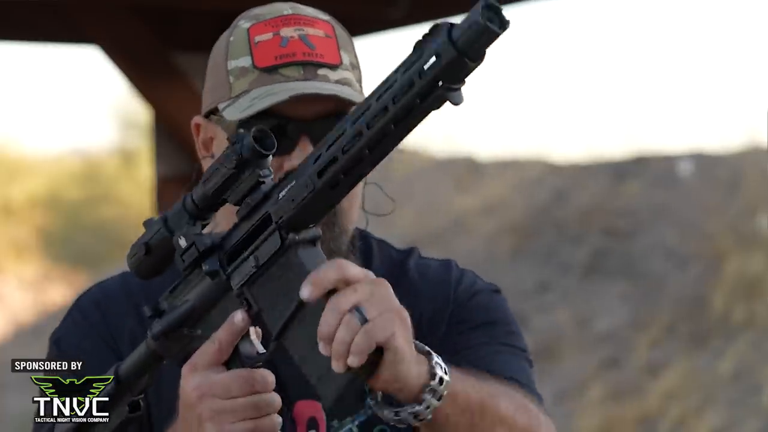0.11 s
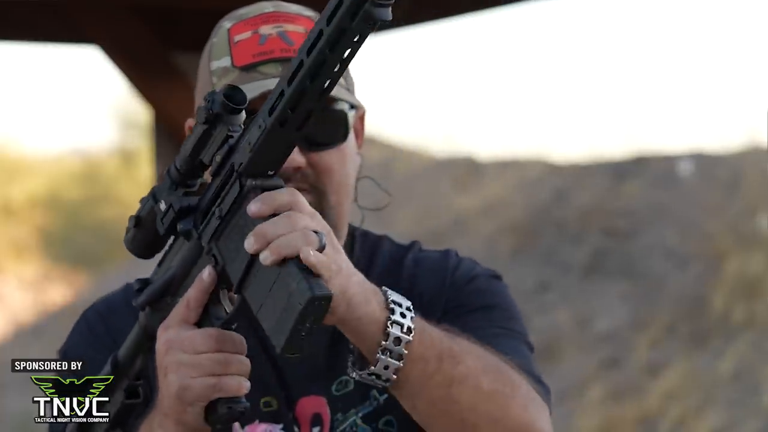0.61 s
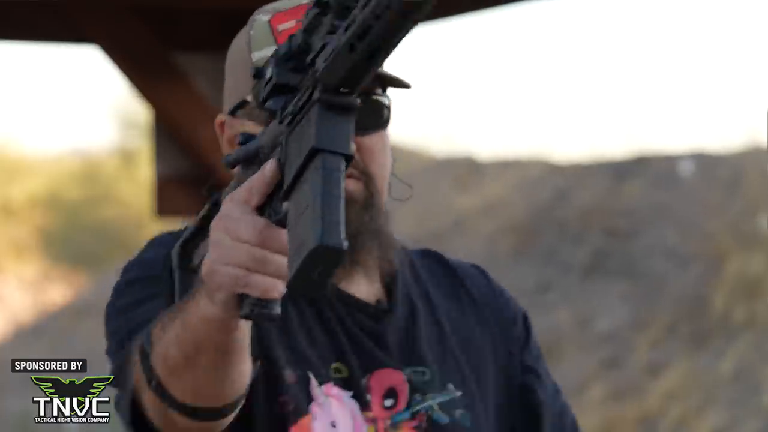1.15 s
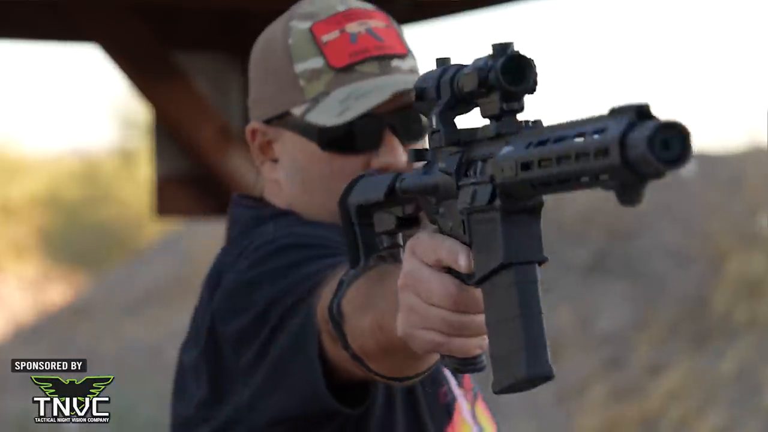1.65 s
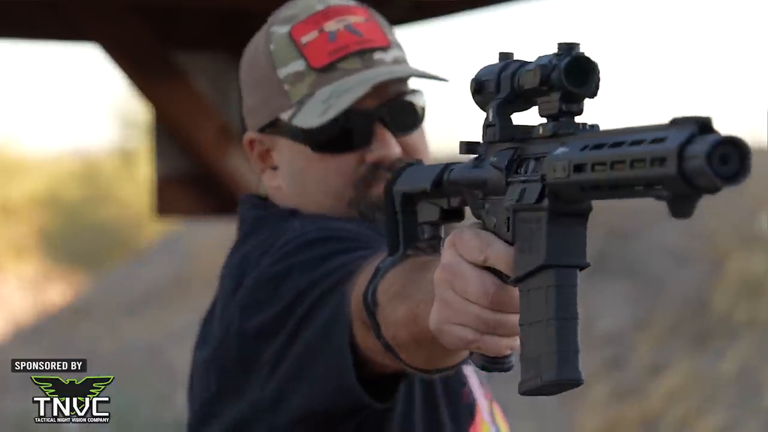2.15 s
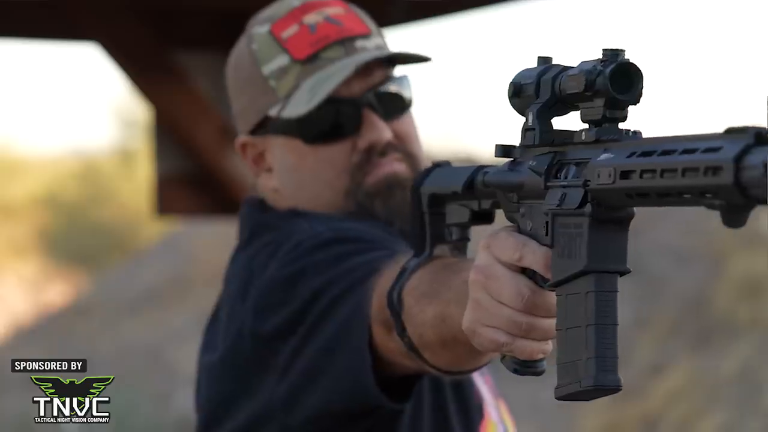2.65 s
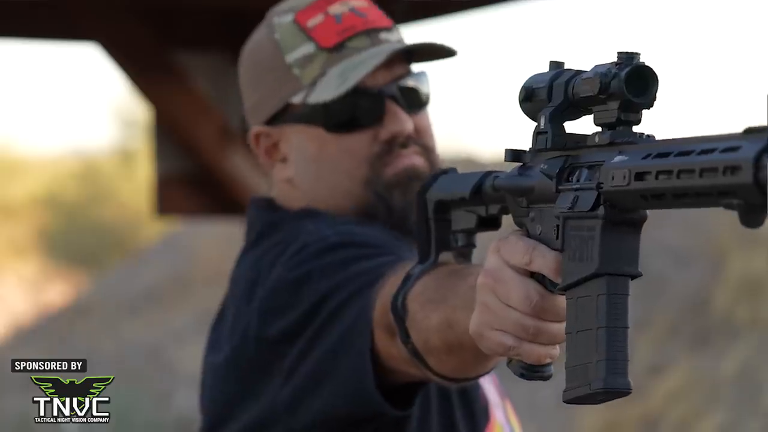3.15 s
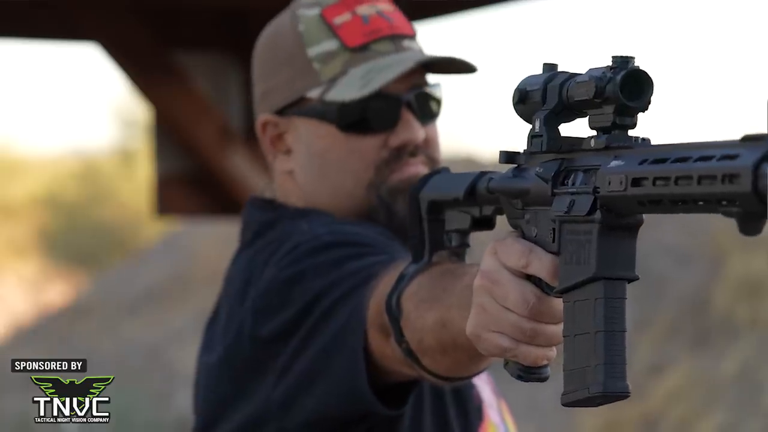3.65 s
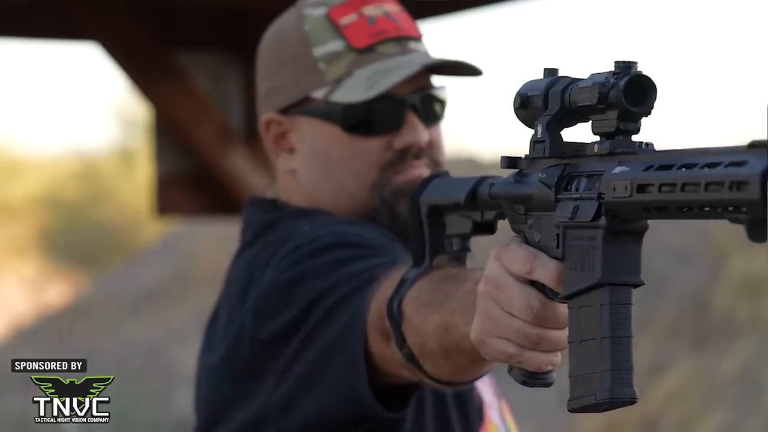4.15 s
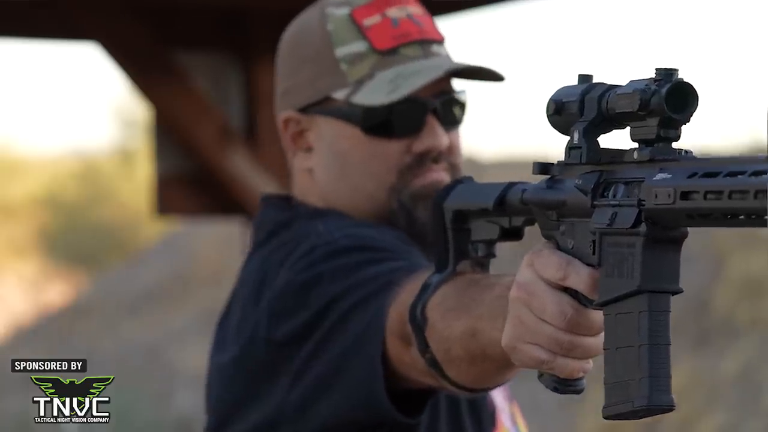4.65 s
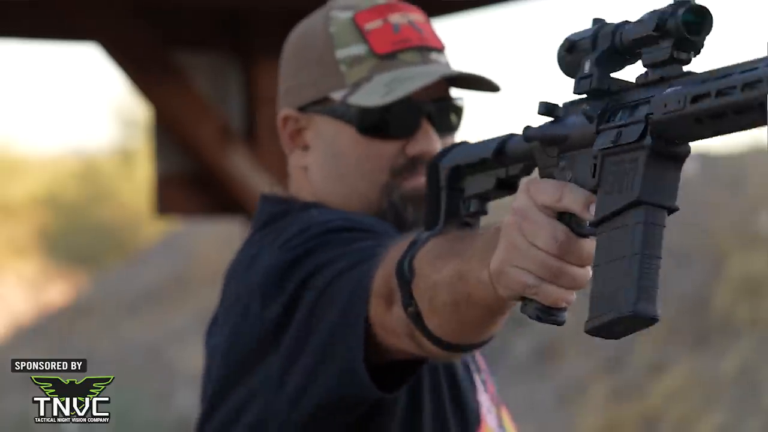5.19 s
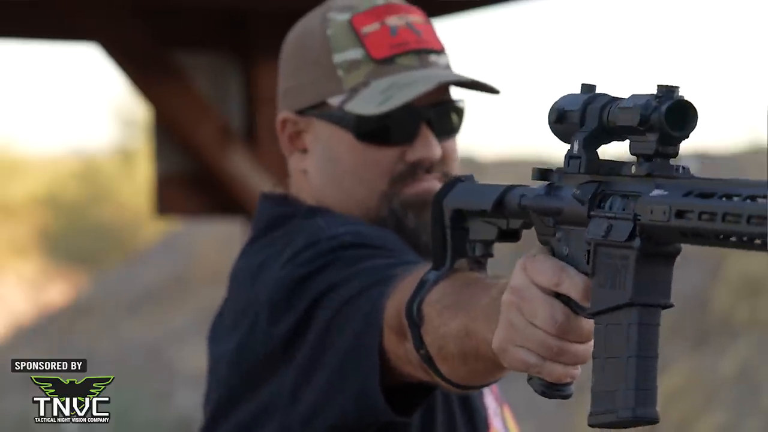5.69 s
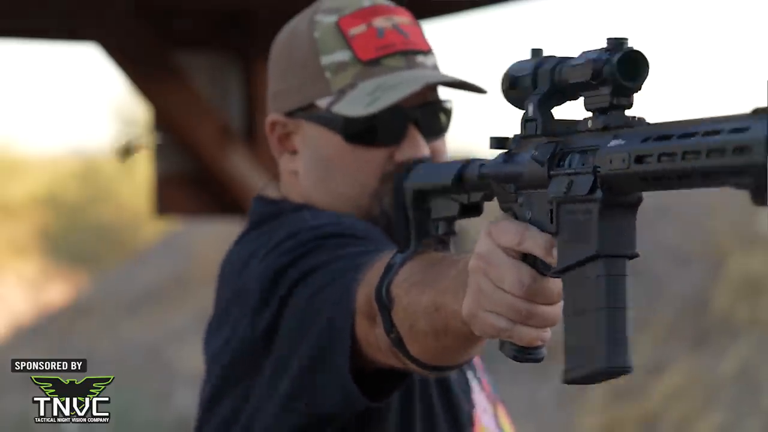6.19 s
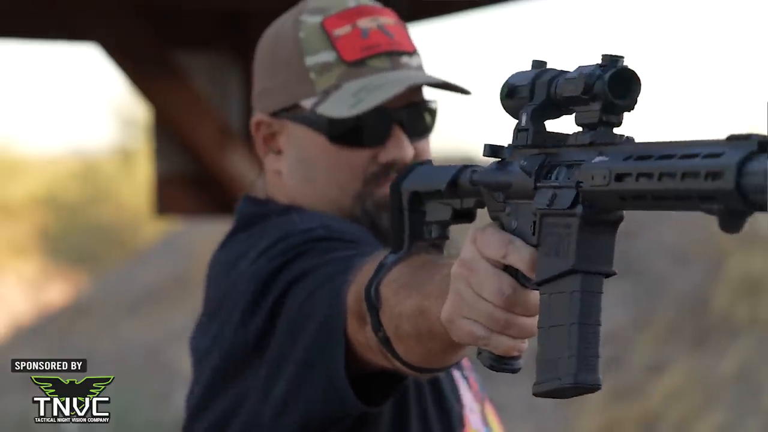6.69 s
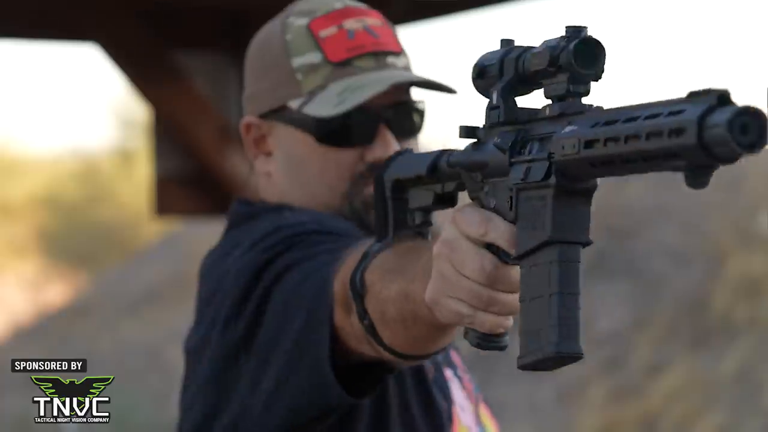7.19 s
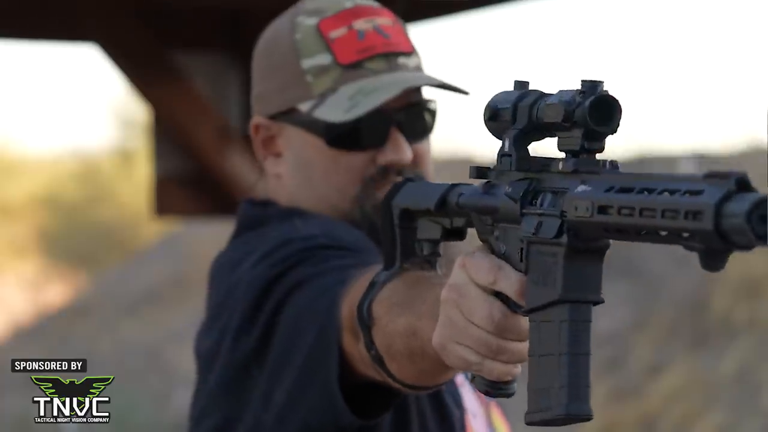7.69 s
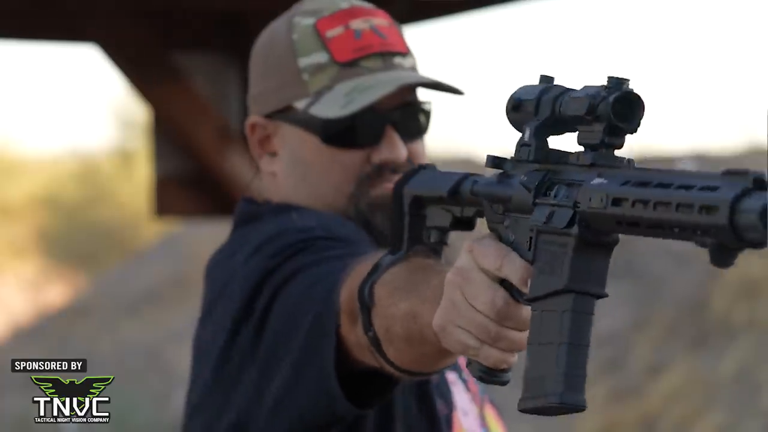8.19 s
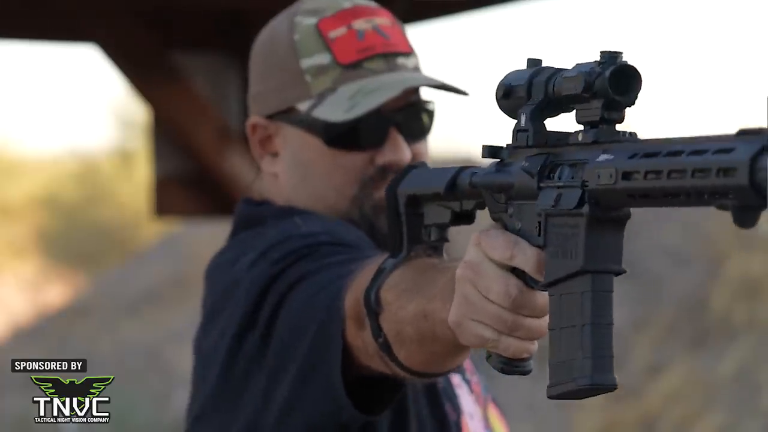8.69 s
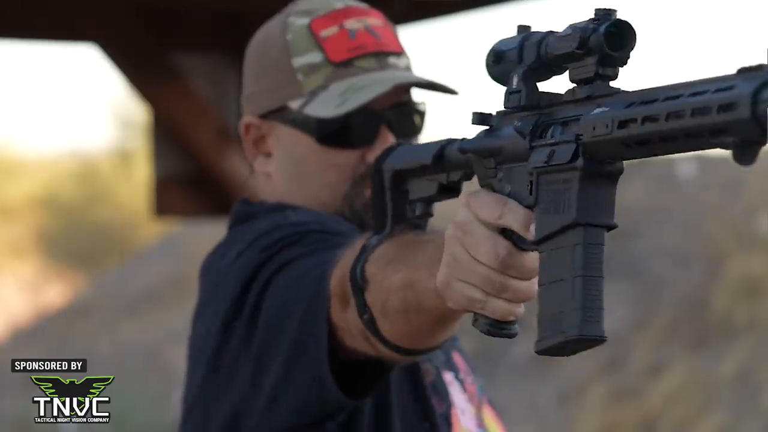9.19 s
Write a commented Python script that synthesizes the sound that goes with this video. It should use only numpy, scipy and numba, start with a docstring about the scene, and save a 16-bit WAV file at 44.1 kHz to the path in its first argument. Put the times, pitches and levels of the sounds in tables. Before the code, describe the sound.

A rifle is loaded and cocked with sharp metallic clacks, distant gunfire thuds dully, then five loud overloaded shots echo off hills as spent cases tinkle.

```python
"""Five rifle shots under a range roof: a low blast, clicks of the action, boom of the sheet roof, echoes off hills.
Before them the rifle is loaded and cocked close by: noise clicks, gritty slides, ringing receiver modes.
Spent cases ring on the concrete as beating mode pairs, and one strikes a steel post; a few low thuds.
Far gunfire is dull noise that swells as the land returns it, over hiss and a faint rumble.
One microphone overloads on the blast and feeds two channels of unequal gain, each with a fast limiter."""
import sys
import numpy as np
from scipy import signal
from scipy.fft import rfft, irfft, next_fast_len
from scipy.io import wavfile
from scipy.ndimage import uniform_filter1d
from numba import njit

SR = 44100
rng = np.random.default_rng(int(sys.argv[2]) if len(sys.argv) > 2 else 0)


def voltage_ratio(decibels):
    """Convert decibels (scalar or array-like) to amplitude ratios, 20 dB per decade."""
    exponent = np.asarray(decibels, float) / 20
    return 10 ** exponent


def to_wav(s):
    """Save 16-bit WAV."""
    ch = np.atleast_2d(s).T  # columns
    pcm = np.round(np.clip(ch, -1, 1) * 32767)  # PCM
    wavfile.write(sys.argv[1], SR, pcm.astype(np.int16))


N = 411453

# Shots of the near rifle: t/s, strength/dB, delay of the bolt hitting its rear stop/s
RIFLE_SHOTS = [(4.8768, 0, .0796), (6.115, 0, .0772), (6.8793, 0, .0772), (7.851, 0.5, 0.081),
               (8.9261, 0, .0778)]
MID_DB = 5.5  # taken off the handling clicks and far fire, to allow for the mean gain of the channels


def band(x, hz, width):
    """Band-pass whose width is a share of its centre."""
    edges = [hz / (1 + width), min(hz * (1 + width), 0.47 * SR)]
    return signal.sosfilt(signal.butter(N=2, Wn=edges, btype="band", fs=SR, output="sos"), x)


def add(out, s, x):
    """Mixes x into out from time s."""
    i = int(s * SR)
    out[i:i + len(x)] += x[:len(out) - i]


def rms(x):
    """Root mean square."""
    return np.sqrt(np.mean(x ** 2))


def wander(size, seconds):
    """Smooth chance of spread 1 that changes over the given time."""
    k = int(seconds * SR)
    x = uniform_filter1d(uniform_filter1d(rng.standard_normal(size), k), k)
    return x / x.std()


def fade(t60):
    """Envelope that loses 60 dB in t60 s."""
    return np.exp(-np.log(1000) * np.arange(int(t60 * SR) + 8) / (t60 * SR))


def ring(hz, db, t60, phase=None):
    """One struck mode: a decaying sine, steady or with a wandering phase in radians."""
    env = fade(t60)
    bend = 0 if phase is None else phase[:len(env)]
    return voltage_ratio(db) * env * np.sin(2 * np.pi * hz * np.arange(len(env)) / SR + bend)


def click(db, hz, t60, width=0.84):
    """A short burst of band-passed noise with a rise of half a ms and its peak at db."""
    env = fade(max(t60, 0.003))[:4096]
    rise = np.minimum(np.arange(len(env)) / 20, 1)
    burst = band(rng.standard_normal(len(env)) * env * rise, hz, width)
    return voltage_ratio(db) * burst / np.abs(burst).max()


def swell(t, db, rise, t60):
    """Power that rises as a bell to db at t = 0, then loses 60 dB in t60 s."""
    decay = voltage_ratio(-120 * np.maximum(t, 0) / t60)
    return voltage_ratio(2 * db) * np.where(t < 0, np.exp(-(t / rise) ** 2), decay)


def controls(t, level, *others):
    """Rows of time, level in dB and each other power in dB against the level."""
    return np.transpose([t, 10 * np.log10(level), *(10 * np.log10(p / level) for p in others)])


def rolling(curve, colour, noises, hump=((0, 500, 0),)):
    """Noise in third-octave bands whose levels follow level, bass and treble curves and a moving hump."""
    hump_octaves = 0.52
    size = noises.shape[1]
    t = np.arange(size) / SR
    s, level_db, bass_db, treble_db = np.transpose(curve)
    hump_s, *columns = np.transpose(hump)
    hump_hz, hump_db = (np.interp(t, hump_s, c) for c in columns)
    colour_hz, *colour_columns = np.transpose(colour)
    freqs = np.fft.rfftfreq(size, 1 / SR)
    spectra = rfft(noises)
    out = 0
    for hz in 40 * 2 ** (np.arange(27) / 3):
        db, bass, treble, *new = (np.interp(np.log(hz), np.log(colour_hz), c) for c in colour_columns)
        spectrum = spectra
        if new:  # the first noise is common to all, the others are fresh for each
            share = np.clip(new[0], 0.01, 1)
            spectrum = np.sqrt(1 - share) * spectra[0] + np.sqrt(share) * spectra[1:]
        mask = np.cos(np.pi / 2 * np.clip(3 * np.log2(freqs / hz + 1e-9), -1, 1))
        lift_db = hump_db * np.exp(-(np.log2(hz / hump_hz) / hump_octaves) ** 2)
        curve_db = db + level_db + bass * bass_db + treble * treble_db
        gain = voltage_ratio(lift_db + np.interp(t, s, curve_db))
        out = out + gain * irfft(spectrum * mask, size) / rms(mask)
    return out


def hiss_and_rumble():
    """Hiss of the microphone, broad noise, over a faint low outdoor rumble."""
    hiss = voltage_ratio(-80.5) * band(rng.standard_normal(N), 6000, 2.7)
    rumble = voltage_ratio(-54) * band(rng.standard_normal(N), 90, 1.4)
    return hiss + rumble


def far_fire():
    """Each distant shot is dull noise that swells as the land returns it, with a low thump off the far side."""
    # Far guns: t/s, level/dB, bass/dB, stretch of the return delays from where the gun stands
    far_shots = [(.06, -54.5, -5, 1), (0.341, -51, -6, 0.97), (.46, -54.5, -4, 1), (.69, -52, -7, 1),
                 (.88, -50, -2, 1), (1.06, -50.5, -6, 0.99), (1.23, -59.5, -4, 1), (2.389, -39.5, 0, 0.98),
                 (2.618, -40, 0.5, 0.96), (2.824, -39.5, -1.5, 0.98), (3.111, -38.5, 0, 1),
                 (3.339, -39.5, -0.5, 1), (3.55, -39, -0.5, 0.97), (4.13, -39, 2.5, 0.88),
                 (4.3, -38.5, 5, 0.84), (4.49, -39, 4.5, 0.77), (4.686, -37.5, 1.5, 0.81),
                 (5.77, -38.5, 5.5, 1)]
    # How the land returns a far shot: delay/s before the stretch, level/dB, rise/s, t60/s,
    # bass/dB before that of the gun, treble/dB
    far_returns = [(.02, -16, .012, .4, 6.5, -8.5), (.1, -14, 0.027, .3, 3, -7.5),
                   (.168, 1, .035, 0.3, -7.5, -19.5), (.275, -3.5, .025, .25, -4.5, -19),
                   (0.389, -12.5, .05, 0.62, 4.5, -20)]
    # Tone of the far fire: f/Hz, level of a third octave/dB, share of the bass, share of the treble
    far_colour = [(60, -21.5, 1, 0.099), (139, -12.5, 0.99, 0.48), (220, -12, 0.94, 0.084),
                  (442, -4.5, 1, 0.075), (900, -5.5, 0, 0), (1420, -6, 0.065, 0.46),
                  (1980, -12, 0.16, 0.92), (3000, -26.5, 0.013, 0.88), (6000, -50.5, 0.38, 0.44)]
    # Murmur between bursts: level/dB, bass/dB, treble/dB
    murmur = (-70.5, 0, 0)
    # Low thump: delay/s, f/Hz, level against the bass of the shot/dB, t60/s
    far_thump = (0.1, 184.5, -4.5, .15)
    quiet_db, quiet_bass_db, quiet_treble_db = murmur
    thump_s, thump_hz, thump_db, thump_t60 = far_thump
    seconds = 6.3
    t = np.arange(0, seconds, 0.002)
    # powers over time
    level = voltage_ratio(2 * quiet_db) + 0 * t
    bass, treble = level * voltage_ratio(2 * quiet_bass_db), level * voltage_ratio(2 * quiet_treble_db)
    out = np.zeros(N)
    for s, db, bass_db, stretch in far_shots:
        thump = ring(thump_hz, db + bass_db + thump_db, thump_t60, 1.5 * wander(SR, 0.025))
        add(out, s + thump_s, thump * np.minimum(np.arange(len(thump)) / 400, 1))
        for delay, part_db, rise, t60, low_db, high_db in far_returns:
            part = swell(t - s - stretch * delay, db + part_db, rise, t60)
            level = level + part
            bass = bass + part * voltage_ratio(2 * (low_db + bass_db))
            treble = treble + part * voltage_ratio(2 * high_db)
    noise = rng.standard_normal((1, next_fast_len(int(seconds * SR))))
    far = rolling(controls(t, level, bass, treble), far_colour, noise)[0]
    fade_out = np.minimum(np.arange(len(far))[::-1] / 8000, 1)
    add(out, 0, voltage_ratio(-MID_DB) * far * fade_out)
    return out


def thuds():
    """Soft low blows: a few low modes struck together."""
    # Modes: f/Hz, level against each other/dB, t60/s
    thud_modes = [(80, 16, 0.77), (124, 11.5, 0.43), (162, -21, 0.22)]
    # Blows, each begun 4 ms ahead: t/s, peak level/dB
    blows = [(1.089, -40.5), (1.324, -40), (1.625, -41), (1.727, -41), (2.235, -41), (4.109, -41)]
    out = np.zeros(N)
    body = sum(np.pad(ring(hz, db, t60), (0, SR))[:SR] for hz, db, t60 in thud_modes)
    for s, db in blows:
        add(out, s - 0.004, voltage_ratio(db) * body / np.abs(body).max())
    return out


def cases():
    """A bounce is a tick and three beating mode pairs; the next one chokes it and the tumbling makes it flutter."""
    # Bounces on the concrete: t/s, tick level/dB, ring level/dB, step from one mode to the next/dB
    bounces = [(5.602, -39, -41.5, -8), (5.684, -45, -55.5, -4), (5.82, -49, -65, -4),
               (5.857, -60, -64, -3), (5.922, -55, -70, -1), (5.978, -59, -74, 1),
               (6.825, -34.5, -48.5, -1.5), (7.27, -41, -57, 1), (7.654, -35, -34, -2.5),
               (8.626, -34, -44, 1), (8.777, -53, -75, 1), (8.836, -51, -79, 5)]
    # Mode pitches, one row a case: f/Hz, f/Hz, f/Hz
    case_hz = [(9577, 12620, 14430), (9450, 12620, 14480), (9440, 12640, 14510), (9426, 12600, 14500)]
    # Mode pairs of brass: nominal split/Hz (varied at each bounce), t60/s, level/dB
    case_pairs = [(35, 0.31, -1), (45, 0.32, -5), (50, 0.29, -0.5)]
    flight_s = 0.6  # a case lands no sooner after its shot
    out = np.zeros(N)
    times = np.transpose(bounces)[0]
    case = np.searchsorted(np.transpose(RIFLE_SHOTS)[0] + flight_s, times) - 1
    same_case_next = np.diff(case) == 0
    untils = np.append(np.where(same_case_next, times[1:], N / SR), N / SR)
    for (s, tick_db, ring_db, step_db), k, until in zip(bounces, case, untils):
        add(out, s, click(tick_db, 8000, 0.01))
        for m, (hz, (split_hz, t60, mode_db)) in enumerate(zip(case_hz[k], case_pairs)):
            db = ring_db + mode_db + m * step_db
            partner_hz = hz - split_hz * rng.uniform(0.57, 1.3)
            pair = ring(hz, db, t60) + ring(partner_hz, db - 8.5, t60)
            flutter = voltage_ratio(3.0 * wander(SR, 0.012)[:len(pair)])
            choke = np.clip(((until - s) * SR - np.arange(len(pair))) / 200 + 1, 0, 1)
            add(out, s, pair * flutter * choke)
    return out


def post_strike():
    """A case strikes a steel post: one long mode of uneven level, with a tick 35 ms ahead of it."""
    # Ring of the post: t/s, f/Hz, level/dB, t60/s
    steel_post = (8.66, 1443, -54, 2.5)
    s, hz, db, t60 = steel_post
    out = np.zeros(N)
    post = ring(hz, db, t60)
    add(out, s, post * voltage_ratio(3.0 * wander(len(post), 0.027)))
    add(out, s - 0.035, click(-28.5, 1400, 0.011))
    return out


def slides():
    """Metal, hands and cloth rubbing: noise of uneven grit under a smooth swell."""
    # Slides: from t/s, to t/s, rms level/dB, f/Hz
    rubs = [(0, 0.066, -47.5, 1100), (0, 0.09, -60.5, 7900), (0.083, 0.147, -44.5, 3000),
            (0.121, 0.176, -44, 1440), (.18, .68, -81, 3500), (0.332, 0.42, -69.5, 3000),
            (0.492, .545, -78, 11000), (0.701, 0.749, -31, 2200), (0.752, 1.629, -79.5, 3490),
            (1.658, 1.98, -78, 3880), (2.64, 2.763, -76.5, 4450)]
    out = np.zeros(N)
    for start, end, db, hz in rubs:
        size = int((end - start) * SR)
        grit = rng.standard_normal(size) * voltage_ratio(1.6 * rng.exponential(size=size))
        rub = band(grit, hz, 1.1) * np.sqrt(np.hanning(size))
        add(out, start, voltage_ratio(db) * rub / rms(rub))
    return out


def receiver_ring():
    """Bolt and selector set the modes of the receiver ringing, the hand damps it."""
    # Rings: t/s, level/dB, share of the free ring time, tilt about 4 kHz/dB an octave
    rings = [(.746, -43.5, 1.2, 0), (1.615, -38, 0.17, 8.5)]
    # Free modes of the rifle: f/Hz, level/dB, t60/s
    rifle_modes = [(2046, -5, .5), (2309, -4, .3), (2864, -9, .3), (3596, -6, .2), (4500, -7, .15),
                   (6481, -5, .25), (6800, -2, .3), (7138, -2, .16), (9249, -8, .13), (10500, -6, .08)]
    out = np.zeros(N)
    for s, ring_db, share, tilt_db in rings:
        for hz, db, t60 in rifle_modes:
            mode_db = db + ring_db + tilt_db * np.log2(hz / 4000)
            add(out, s, ring(hz, mode_db, share * t60))
    return out


def handling():
    """Loading, cocking and small ticks as clicks in three bands; heavy blows ring longer, in step with size."""
    # Magazine, bolt, selector and small ticks, some at the start of far shots: t/s,
    # level near 4.8 kHz before MID_DB/dB, level near 1.1 kHz against it/dB, level near 10.6 kHz against it/dB
    knocks = [(0.0074, -40, 10, -5), (0.027, -41, 7, -11), (0.0947, -35, -8.5, -13), (0.106, -22.5, -2, 7),
              (0.1294, -13.5, 4, -3.5), (0.2214, -43, -12, -9), (0.262, -42, -1, -8), (0.3272, -52.5, 7, 7),
              (0.3475, -52, 19, -10), (0.5124, -67, 19, 21), (0.53, -53.5, -9, 10),
              (0.613, -59.5, 11.5, -12), (0.6864, -14.5, -3.5, -4), (0.7012, -17, 4.5, 1.5),
              (0.7198, -22.5, 6.5, -10.5), (0.7328, -18.5, -2.5, 2.5), (0.7445, -6, -7, -7),
              (0.878, -35.5, -14, -11), (0.9515, -42.5, -9, -6), (1.0834, -46, -15, 7),
              (1.5686, -28, -14, 0), (1.614, -16, -8.5, -1), (1.7474, -52, -1, -16),
              (1.7993, -53, 4, -18.5), (2.15, -50.5, 9, -25.5), (2.3892, -54, 17.5, -28),
              (2.6174, -58.5, 16.5, -13), (3.5823, -55, 5, -24), (4.1324, -67, 13, -10)]
    out = np.zeros(N)
    for s, db, low_db, high_db in knocks:
        t60 = 0.016 + 0.03 * voltage_ratio(db)
        for hz, band_db, width in ((1100, low_db, 1.1), (4800, 0.0033, 0.45), (10600, high_db, 0.38)):
            add(out, s, click(db + band_db - MID_DB, hz, t60, width))
    return out


def echo_curve(seconds):
    """The reflectors add up in power; the longer the path, the more treble the air takes."""
    # What throws the blast back, roof first, then banks and hills: delay/s, level/dB, t60/s,
    # bass against it/dB, treble against it before the loss in the air/dB
    reflectors = [(0.01, 4, 0.19, -12.5, -3), (.045, -1, 0.063, -11, -5), (.095, -18, .07, -23, -4.5),
                  (.13, -32.5, 0.41, -9.5, 0), (.17, -29, .45, -8, -3.5), (.22, -39.5, .4, -4, 2),
                  (0.277, -31.5, 0.43, 6, -3), (.33, -32.5, 0.55, 3.5, -2.5), (0.441, -27, 0.85, -3, -4),
                  (0.516, -27, .25, -6, -2.5), (.6, -37, 0.41, -0.5, -3.5), (.68, -29.5, 0.85, -3.5, -4.5),
                  (0.781, -36, 0.63, -4.5, 1.5), (.92, -47.5, 0.28, 7, -8), (1.0, -44, 1.7, -6, -1.5)]
    treble_loss_db_per_s = 27
    t = np.arange(0, seconds, 0.002)
    parts = []
    for s, db, t60, *_ in reflectors:
        rise = 0.007 + 0.11 * s  # far faces are spread out and swell slowly
        parts.append(swell(t - s, db, rise, t60) + 1e-12)
    parts = np.array(parts)
    bass, treble = voltage_ratio(2 * np.transpose(reflectors)[-2:]) @ parts
    return controls(t, parts.sum(axis=0), bass, treble * voltage_ratio(-2 * treble_loss_db_per_s * t))


def echoes():
    """Roof, banks and hills answer each shot in one pattern; mostly the treble is scattered anew."""
    # Tone of the echoes: f/Hz, level of a third octave/dB, share of the bass, share of the treble,
    # share new in each shot (at least 0.01)
    echo_colour = [(40, -27.5, 0.91, 0, 0.072), (120, -12.5, 0.77, 0, .05), (223, -5, 0.93, 0.5, 0.042),
                   (300, -8.5, 0.8, 0, 0.02), (470, -10.5, 0.081, 0, 0.13), (820, 2.5, 0.16, 0.5, 0.069),
                   (1100, -3.5, 0.24, 0.4542, 0.14), (2200, -6.5, 0.35, 0.774, 0.52),
                   (4350, -1, 0.41, 1.6045, 0.56), (9000, -8, 0.5, 2, 0.85), (16000, -5, 0.18, 3, 0.88)]
    # The far slope answers with a hump that sinks in pitch: delay/s, centre f/Hz, lift/dB
    slope = [(.36, 900, -4), (.41, 514, 3), (0.468, 396, 7), (.54, 320, 12.5), (.62, 300, 9), (.72, 293, 3)]
    seconds = 1.24
    size = next_fast_len(int(seconds * SR))
    # rocks and banks send back single reflections, so the wash is lumpy
    grain = voltage_ratio(1 * wander(size, 0.0049))  # spread of 1 dB
    noises = grain / rms(grain) * rng.standard_normal((len(RIFLE_SHOTS) + 1, size))
    washes = rolling(echo_curve(seconds), echo_colour, noises, slope)
    washes *= np.minimum(np.arange(size)[::-1] / 2000, 1)
    out = np.zeros(N)
    for (s, db, _), wash in zip(RIFLE_SHOTS, washes):
        add(out, s, voltage_ratio(db) * wash)
    return out


def roof_boom():
    """The sheet roof booms after the blast: modes whose phase wanders much alike in every shot."""
    # Modes of the roof: delay/s, f/Hz, level/dB, t60/s
    roof_modes = [(.006, 933, 3.5, 0.13), (.006, 845, 4, 0.17), (.008, 758.5, 8.5, 0.18),
                  (.01, 659.2, 8, 0.16), (.012, 580, 0.5, .22), (.045, 251.9, -8.5, 0.23)]
    out = np.zeros(N)
    bends = [2.46 * wander(SR, 0.03) for _ in roof_modes]  # radians
    for s, db, _ in RIFLE_SHOTS:
        for (delay, hz, mode_db, t60), bend in zip(roof_modes, bends):
            phase = bend + 0.74 * wander(SR, 0.025)
            add(out, s + delay, ring(hz, mode_db + db, t60, phase))
    return out


def shots():
    """The near rifle: a low blast, noise clicks, and the bolt at its rear stop with the ring of the buffer tube."""
    # In every shot, hammer, muzzle crack, action clatter, slap from a berm:
    # delay/s, peak level/dB, f/Hz, t60/s (at least 0.003)
    shot_clicks = [(-.0068, -19.5, 5120, 0.0047), (-.0003, -1.5, 5000, .005), (0.019, 7.5, 5040, 0.022),
                   (0.0333, 6.5, 4440, 0.024), (0.042, 1, 4930, 0.035), (0.1342, -14, 1500, 0.0069),
                   (0.1345, -16, 5300, 0.0062), (.136, -4.5, 1450, .008), (0.136, -17, 5460, 0.0051),
                   (0.161, -29, 2040, 0.024)]
    bolt_db, bolt_hz, bolt_t60 = -9.5, 6900, 0.042
    out = np.zeros(N)
    for s, db, bolt_s in RIFLE_SHOTS:
        add(out, s + 0.001, ring(215, 30 + db, 0.0071))  # blast
        bolt_start = s + bolt_s - 0.0015  # begun 1.5 ms ahead of the hit
        add(out, bolt_start, click(bolt_db, bolt_hz, bolt_t60))
        add(out, bolt_start, click(bolt_db - 4.0, bolt_hz, bolt_t60, width=0.05))  # the buffer tube rings
        for delay, click_db, hz, t60 in shot_clicks:
            add(out, s + delay, click(click_db, hz, t60))
    return out


def under_roof(near):
    """The roof adds a short tail, decaying noise, to the small near sounds."""
    tail = fade(0.15)
    tail = tail * band(rng.standard_normal(SR), 2300, 6.9)[:len(tail)]
    tail = tail / np.sqrt(np.sum(tail ** 2))
    return near + voltage_ratio(-10.5) * signal.fftconvolve(near, tail)[:N]


def scene():
    """All sources at the one microphone, given alike to both channels."""
    background = hiss_and_rumble() + far_fire() + thuds()
    near = under_roof(cases() + post_strike() + slides() + receiver_ring() + handling())
    air = background + near + echoes() + roof_boom() + shots()
    return np.array([air, air])


@njit
def limit(x, ceiling, release):
    """Gain drops at once on a peak and comes back as the held peak decays by release each sample."""
    y = np.empty(len(x))
    held = 0.
    for i in range(len(x)):
        held = max(abs(x[i]), held * release)
        y[i] = x[i] * min(1., ceiling / (held + 1e-9))
    return y


def low_pass(x):
    """Removes everything above the highest recorded frequency."""
    return signal.sosfilt(signal.butter(12, 17100, fs=SR, output="sos"), x)


def record(dry):
    """The capsule clips, the bass is cut, then each channel has its gain and limiter, and the top is cut."""
    mic_clip, low_cut_hz, top_hz = 0.96, 235.6, 15900
    left_db = 9.0  # gain of the left channel over the right
    ceiling, release_s = 0.6, 0.0087
    capsule = np.clip(dry, -mic_clip, mic_clip)
    low_cut = signal.butter(N=2, Wn=low_cut_hz, btype="high", fs=SR, output="sos")
    left, right = signal.sosfilt(low_cut, capsule)
    release = np.exp(-1 / (release_s * SR))
    limited = np.array([limit(voltage_ratio(left_db) * left, ceiling, release), limit(right, ceiling, release)])
    top_cut = signal.ellip(N=8, rp=0.5, rs=40, Wn=top_hz, fs=SR, output="sos")
    return low_pass(signal.sosfilt(top_cut, limited))


dry = scene()
out = record(dry)
to_wav(out)
```